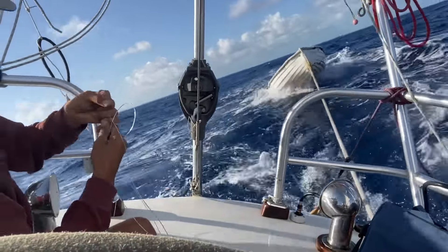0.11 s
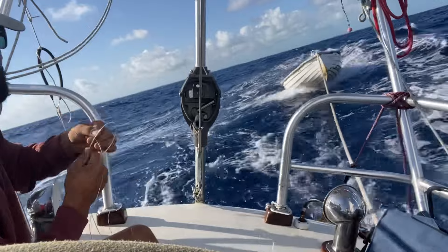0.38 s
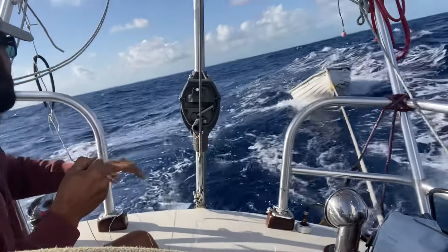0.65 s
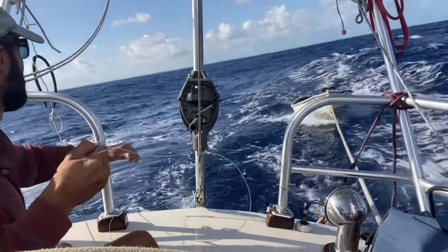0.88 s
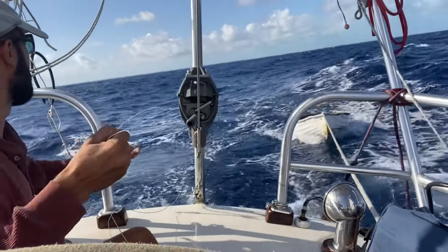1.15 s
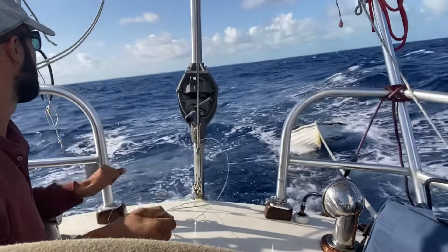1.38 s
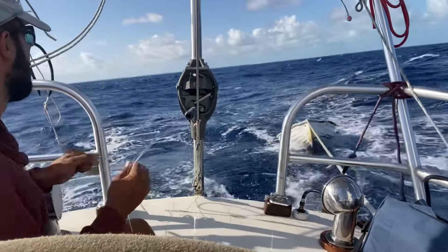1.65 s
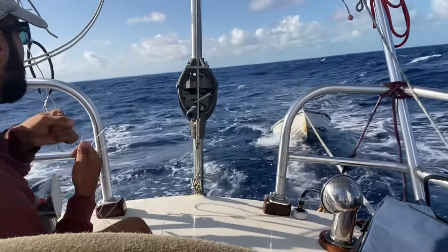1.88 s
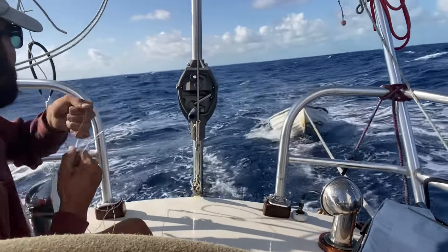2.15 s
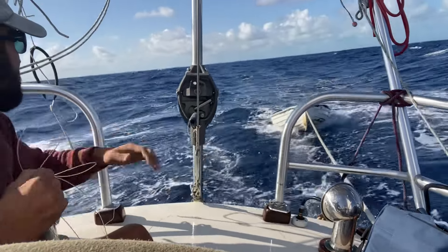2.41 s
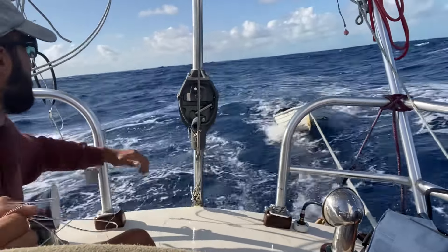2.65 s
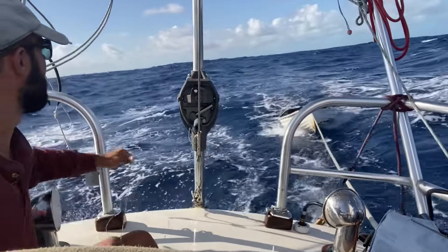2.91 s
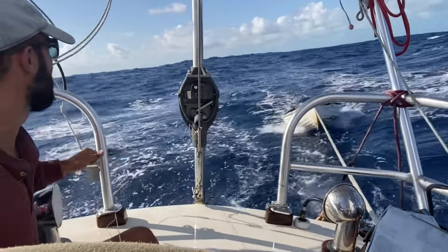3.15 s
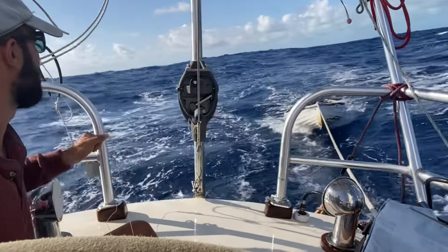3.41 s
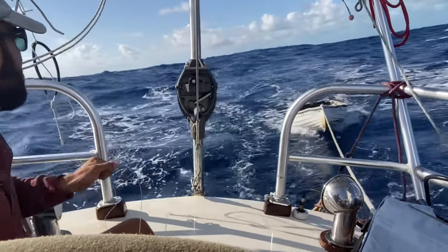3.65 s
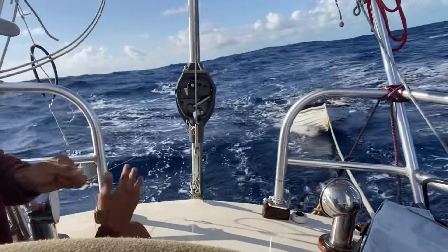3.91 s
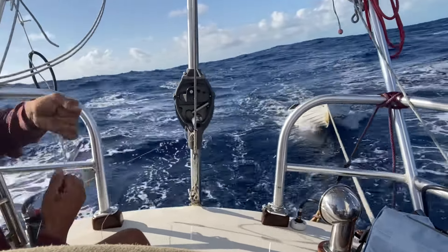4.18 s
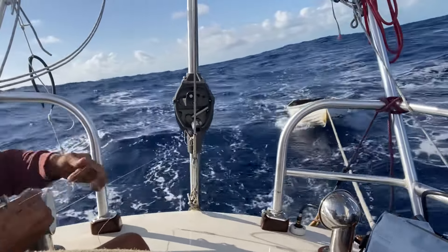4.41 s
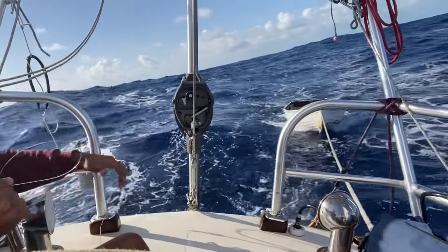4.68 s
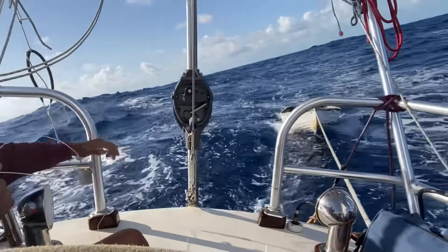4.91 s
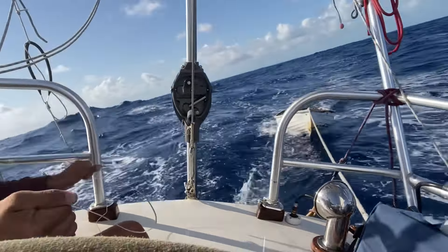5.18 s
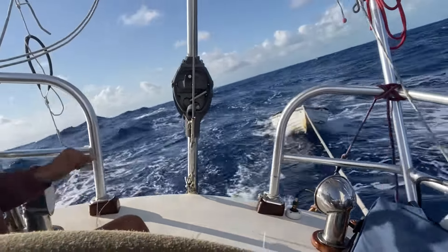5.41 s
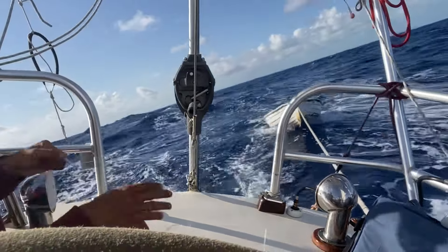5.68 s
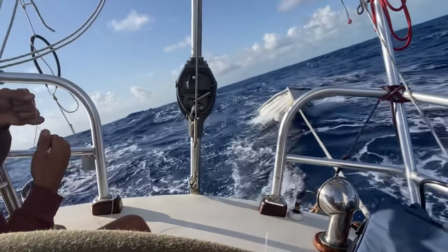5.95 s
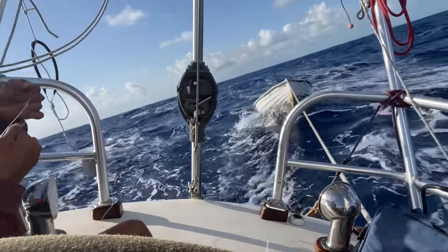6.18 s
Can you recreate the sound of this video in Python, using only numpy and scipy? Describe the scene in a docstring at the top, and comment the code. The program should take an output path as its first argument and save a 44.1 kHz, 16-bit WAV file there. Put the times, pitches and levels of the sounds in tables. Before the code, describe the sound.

Wind hits a small stereo microphone in the open cockpit of a sailboat, far louder than the sea. From 0 s a lumpy low rumble and flutter rise quickly, with dull air thuds around 0.3 to 0.7 s and again from 0.9 to 1.5 s, joined by short rough puffs on the right. From about 1.8 s the puffs thicken, crackling and tearing, with heavy blows near 2.3, 2.7, 3.05 and 3.2 s and the hardest puff at 3.54 s. A tiny metal rattle ticks at 2.55 s. Another tight group of deep thumps comes at 4.1 to 4.5 s; afterwards the wind eases, with small puffs at 5.15 and 5.5 s and a low thud at 6.1 s. Throughout, faint foam hiss and duller water wash waver behind, with small bright spray slaps near 1.25, 1.4, 3.5 and 3.9 s. It ends at 6.3 s mid-wind.

```python
"""Gusts buffet the two ports of a small stereo microphone in the cockpit of a sailboat in a rough sea.
Turbulence is shaped noise that swells in lumps: low rumble, flutter above it and crackle, more on the right.
Low tone bursts are thuds of air; bursts of noise and falling tone are puffs of large eddies on the right port.
Behind the wind, wandering hiss and wash are the foam of the wake, bright noise bursts are slaps of spray,
and a few decaying modes make a metal fitting rattle once."""
import sys
import numpy as np
from scipy import signal
from scipy.fft import rfft, irfft, next_fast_len
from scipy.io import wavfile
from scipy.ndimage import uniform_filter1d, map_coordinates

SR = 44100
rng = np.random.default_rng(int(sys.argv[2]) if len(sys.argv) > 2 else 0)


def master_out(mix):
    """Clip the mix to full scale and print it as 16-bit PCM to the path in sys.argv[1]."""
    frames = np.transpose(np.atleast_2d(mix))
    ceiling = np.clip(frames, -1, 1)
    pcm = np.round(ceiling * 32767).astype(np.int16)
    wavfile.write(sys.argv[1], SR, pcm)


def invert_db(level):
    """Linear amplitude ratio for a level in decibels (20 dB per decade), elementwise."""
    return 10 ** (np.asarray(level, dtype=float) / 20)


N = 278271  # samples

# wind on the ports, as rumble outside the lulls: (time [s], level [dB])
WIND_STRENGTH = [(0.0, -32.5), (0.2, -32), (0.3, -20.5), (0.4, -31.5), (0.55, -23.5), (0.7, -20.5),
                 (0.77, -31.5), (0.95, -21), (1.04, -28.5), (1.2, -21), (1.9, -21), (1.97, -25),
                 (2.15, -21.5), (3.76, -20), (3.83, -24.5), (4.12, -17), (4.33, -20.5), (4.39, -20.5),
                 (4.52, -20), (4.67, -26), (4.97, -21), (5.24, -22), (5.32, -31), (5.45, -22.5),
                 (5.55, -24.5), (5.72, -27.5), (5.85, -23.5), (6.1, -25.5), (6.31, -24.5)]
# flutter relative to the wind, away from thuds: (time [s], level [dB])
FLUTTER_RATIO = [(0.0, -3.5), (0.5, -2.5), (0.7, -5), (1.1, -7.5), (1.16, 5), (1.21, -1.5), (1.26, -7),
                 (1.9, -2), (2.4, -9.5), (3.6, -6), (4.07, -12), (4.11, -2), (4.19, -0.5), (4.24, -10),
                 (4.3, -3.5), (4.6, -11.5), (5.05, -5), (5.3, -8), (5.8, -4.5), (6.31, -3.5)]
# small eddies, mean of both ports: (time [s], level [dB])
CRACKLE_STRENGTH = [(0.0, -41), (0.68, -39), (1.1, -40.5), (1.3, -37), (1.93, -40), (2.3, -35), (3.9, -35),
                    (4.83, -42), (6.31, -42)]
# slugs of air: (time of the swell's peak on the right [s], envelope peak [dB], frequency [Hz])
AIR_SLUGS = [(0.308, -9.5, 130), (0.53, -12, 111), (0.618, -8, 89), (0.661, -10.5, 74.6), (0.921, -9, 119),
             (0.968, -14, 80), (1.076, -10, 88), (1.18, -15, 121), (1.2, -10, 130), (1.265, -7, 115),
             (1.372, -9.5, 121), (1.498, -10, 94.5), (1.793, -9, 133), (2.178, -8.5, 80),
             (2.317, -6.5, 133), (2.702, -6, 99), (2.866, -6, 91.5), (3.047, -10, 117), (3.215, -5, 125),
             (4.089, -10, 83), (4.215, -9.5, 99), (4.296, -4.5, 126), (4.338, -6, 121), (4.514, -9, 112),
             (5.446, -17, 91), (6.113, -10, 66)]
# largest eddies, before the gain of each port: (time [s], level [dB], nominal frequency [Hz])
LARGE_EDDIES = [(0.295, -11.5, 810), (0.316, -12, 824), (0.795, -10, 800), (1.195, -12.5, 950),
                (1.179, -11, 1100), (1.262, -10, 1050), (1.345, -14, 1090), (1.471, -15.5, 970),
                (1.516, -13.5, 1040), (1.85, -9.5, 1040), (2.012, -9, 1230), (2.067, -16, 780),
                (2.09, -9.5, 905), (2.166, -9.5, 846), (2.235, -10, 1190), (2.312, -9.5, 880),
                (2.476, -19, 930), (2.483, -10, 865), (2.515, -15, 1050), (2.591, -9, 977),
                (2.697, -6, 1350), (2.701, -10.5, 1920), (2.705, -6, 1150), (2.796, -11.5, 1110),
                (3.001, -12, 840), (3.041, -6, 1070), (3.075, -16, 950), (3.086, -12, 980),
                (3.101, -13, 1060), (3.159, -12, 1200), (3.181, -14.5, 1000), (3.209, -12.5, 1010),
                (3.472, -12, 1300), (3.54, -3.5, 1010), (3.627, -9.5, 1180), (3.653, -12, 1280),
                (3.6675, -8, 1150), (3.685, -8, 1030), (3.716, -15, 1090), (3.726, -15, 1040),
                (3.982, -14.5, 1090), (4.159, -15, 744), (4.305, -22, 653), (4.471, -14, 1140),
                (5.144, -10.5, 870), (5.49, -13, 860)]
# contacts of a small metal fitting in the rigging: (time [s], level [dB], pitch factor [1])
CONTACTS = [(2.5519, -26.5, 1.05), (2.557, -27, 1.0), (2.561, -30, 0.85), (2.568, -29, .93)]
# modes of the fitting, before random spread: (frequency [Hz], level [dB], decay by 60 dB [s])
FITTING_MODES = [(1420, 1, 0.032), (1790, 2, 0.031), (3330, 1, 0.02), (7080, -4, 0.016)]
# slaps of spray: (time [s], level [dB], centre frequency [Hz])
SPRAY_SLAPS = [(1.254, -27, 3250), (1.4063, -28, 4620), (3.534, -25, 4900), (3.883, -25, 8200)]
# foam in the wake: (time [s], hiss level [dB], wash level [dB])
FOAM = [(0.0, -44.5, -40.5), (0.28, -43, -41), (0.44, -45.5, -43), (0.52, -41.5, -40), (0.8, -45, -41.5),
        (1.15, -48, -47), (1.3, -45.5, -43), (1.54, -49, -47.5), (2.3, -46, -43), (2.48, -48.5, -46.5),
        (2.68, -44, -43), (3.13, -49, -48.5), (3.6, -45.5, -47), (4.27, -49, -50.5), (4.52, -46, -44.5),
        (4.95, -50, -48.5), (5.18, -49.5, -48), (5.48, -47, -45), (6.06, -45.5, -44.5), (6.18, -44, -44),
        (6.31, -47.5, -48.5)]
# bands in which rumble, flutter, crackle, hiss and wash have their levels: (low [Hz], high [Hz])
LEVEL_BANDS = [(40, 180), (200, 700), (800, 2000), (6000, 9500), (2200, 5000)]
# relative spectra of the five noises: (frequency [Hz], level [dB])
RUMBLE_SPECTRUM = [(15, -60), (25, -30), (40, -6.5), (62, -0.5), (100, -3), (170, -11), (300, -22),
                   (600, -30), (2000, -120)]
FLUTTER_SPECTRUM = [(40, -69), (120, -4.5), (250, -1.5), (450, -3.5), (800, -10.5), (1300, -27),
                    (2500, -37), (12000, -120)]
CRACKLE_SPECTRUM = [(100, -47), (400, -1), (800, 5), (1300, -3.5), (2000, -15), (3000, -61), (9000, -74)]
HISS_SPECTRUM = [(1000, -64), (3500, -9), (6000, -1.5), (8000, 1), (11000, -1), (14000, -4.5), (15700, -7)]
WASH_SPECTRUM = [(100, -48), (300, 5), (800, 2.5), (1500, 1.5), (2500, -1.5), (3700, -5), (5000, -8),
                 (7000, -13.5), (16000, -75)]
# likeness and phase of the two channels: (frequency [Hz], likeness [0-1], lead of the right [rad])
RUMBLE_HEARING = [(30, 0.53, -0.19), (130, 0.48, -1.15), (400, 0.34, -1.4)]
FLUTTER_HEARING = [(150, 0.94, 0), (345, 0.8, -1.5), (617, 0.058, -3), (1400, 0.3, -0.5)]
CRACKLE_HEARING = [(400, 0.48, -3.5), (595, 1, -3), (1370, 0.37, 0), (2130, 1, 2)]
HISS_HEARING = [(4930, 0.36, 4.5), (5720, 0.66, 0.5), (7950, .99, 0.5), (9630, 1, -2), (11510, 1, -4.5),
                (13650, 0.86, -7), (15300, 0.98, -9.5)]
WASH_HEARING = [(1440, 0.7, 1.21), (2810, 0.5, 3.06), (4160, 0.19, 4.22), (5400, 0.13, 3.6)]

RUMBLE_BAND, FLUTTER_BAND, CRACKLE_BAND, HISS_BAND, WASH_BAND = LEVEL_BANDS
STIR_DB, STIR_S = 3.5, 0.021  # flare of the flutter around each thud: height, half length
LULL_DB = 4  # the loose rumble yields while a thud passes
THUD_LAG_S, THUD_CYCLES = 0.0012, 0.68  # delay of the left, half length in cycles
PUFF_LAG_S = 0.00057  # delay of the left
PUFF_RIGHT_DB, PUFF_LEFT_DB = 2.5, -6.5  # gain on each port
PUFF_CYCLES, PUFF_GROWS = 3.75, 0.46  # swell time in cycles at 0 dB, its growth in dB per dB
PUFF_FALL = 0.44  # fall of the whirl in octaves per swell time
SLAP_S, SLAP_OCTAVES = 0.0036, 1  # swell time, width


def unit(x):
    """Normalisation: scales a signal to rms 1."""
    return x / np.sqrt(np.mean(x ** 2) + 1e-20)


def curves(rows):
    """Linear interpolation: one value per sample for each column after the time."""
    s, *cols = np.transpose(rows)
    return [np.interp(np.arange(N) / SR, s, c) for c in cols]


def wobble(rate):
    """Band-limited fluctuation: a smooth random curve with rate knots a second."""
    knots = rng.standard_normal(int(N * rate / SR) + 4)
    return map_coordinates(knots, [np.arange(N) * rate / SR])


def stereo(pair, spectrum, hearing, band):
    """Coherence: two coloured inputs mix to a given likeness and phase; their mean has rms 1 in the band."""
    size = next_fast_len(N + 8192)
    hz = np.fft.rfftfreq(size, 1 / SR)
    f, db = np.transpose(spectrum)
    a, b = rfft(pair, size) * invert_db(np.interp(np.log(hz + 1), np.log(f + 1), db))
    f, alike, lead = np.transpose(hearing)
    # the cosine of twice this angle is the likeness
    turn = np.arccos(np.clip(np.interp(hz, f, alike), 0, 1)) / 2
    half_lead = np.exp(.5j * np.interp(hz, f, lead))
    mid, side = a * np.cos(turn), b * np.sin(turn)
    both = np.array([(mid + side) / half_lead, (mid - side) * half_lead])
    inside = irfft(both.mean(axis=0) * (hz > band[0]) * (hz < band[1]), size)[:N]
    return irfft(both, size)[:, :N] / inside.std()


def patchy(depth_db):
    """Intermittency: the gain of two noises wanders in patches of time and frequency."""
    z = signal.stft(rng.standard_normal((2, N)), nperseg=512)[2]
    field = rng.standard_normal(z.shape[1:])
    field = uniform_filter1d(field, size=8, axis=0)
    field = uniform_filter1d(field, size=10, axis=1)
    return signal.istft(z * invert_db(depth_db * unit(field)), nperseg=512)[1][:, :N]


def burst(hz, width, life, whirl=0):
    """Transient excitation: noise around hz, with a share of falling tone, swells and fades to peak 1."""
    t = np.arange(SR // 10) / SR
    octaves = np.log2((np.fft.rfftfreq(len(t), 1 / SR) + 1) / hz)
    # steeper above hz than below
    colour = np.exp(-.5 * (octaves / np.where(octaves > 0, 0.32 * width, width)) ** 2)
    noise = unit(irfft(rfft(rng.standard_normal(len(t))) * colour, len(t)))
    pitch = hz * 2 ** (PUFF_FALL * (1 - t / life))
    turning = np.sin(2 * np.pi * (np.cumsum(pitch) / SR + rng.random()))
    swell = np.exp(-np.abs(t / life - 1) ** 1.9)
    onset = 1 - np.exp(-(2 * t / life) ** 2)
    x = ((1 - whirl) * noise + whirl * turning) * swell * onset
    return x / np.abs(x).max()


def buffeting():
    """Turbulence: eddies of every size swell rumble and flutter together; the smallest burst as crackle."""
    wind_db, = curves(WIND_STRENGTH)
    crackle_db, = curves(CRACKLE_STRENGTH)
    flutter_db = wind_db + curves(FLUTTER_RATIO)[0]
    t = np.arange(N) / SR
    passing = np.max([np.exp(-((t - s) / STIR_S) ** 2) for s, db, hz in AIR_SLUGS], axis=0)
    flutter_db += STIR_DB * passing
    lumps, eddies, small = wobble(9), wobble(22), wobble(70)

    rumble_gain = invert_db(0.65 * lumps + 0.59 * eddies + 0.7 * wobble(15))
    rumble_noise = rumble_gain * rng.standard_normal((2, N))
    rumble = stereo(rumble_noise, RUMBLE_SPECTRUM, RUMBLE_HEARING, RUMBLE_BAND)

    flutter_gain = invert_db(0.52 * lumps + 0.98 * eddies + 3.5 * small)
    flutter_noise = flutter_gain * patchy(depth_db=2.0)
    flutter = stereo(flutter_noise, FLUTTER_SPECTRUM, FLUTTER_HEARING, FLUTTER_BAND)

    # about 190 tiny puffs a second, each 4.1 ms long, over steady noise
    sizes = invert_db(np.minimum(3 * rng.standard_normal(N) + 3 * small, 7))
    sizes = (rng.random(N) < 190 / SR) * sizes
    ticks = 0.68 + np.convolve(sizes, np.hanning(round(0.0041 * SR)), "same")
    crackle_noise = ticks * rng.standard_normal((2, N))
    crackle = stereo(crackle_noise, CRACKLE_SPECTRUM, CRACKLE_HEARING, CRACKLE_BAND)

    out = invert_db(wind_db - LULL_DB * passing) * rumble
    out = out + invert_db(flutter_db) * flutter
    return out + invert_db(crackle_db + [[-2.2], [2.2]]) * crackle  # stronger on the right


def thuds():
    """Pressure pulses: each slug of air is a low tone in a Gaussian swell, a little late on the left."""
    t = np.arange(N) / SR - [[THUD_LAG_S], [0]]
    out = np.zeros((2, N))
    for s, db, hz in AIR_SLUGS:
        swell = np.exp(-((t - s) * hz / THUD_CYCLES) ** 2)
        out += invert_db(db) * swell * np.sin(2 * np.pi * (hz * (t - s) + rng.random()))
    return out


def puffs():
    """Vortex bursting: a whirl slows over a slower push; the left has a late, weak inverse and its own noise."""
    out = np.zeros((2, N + SR))
    for s, db, hz in LARGE_EDDIES:
        life = PUFF_CYCLES * invert_db(PUFF_GROWS * db) / hz  # weaker eddies are shorter
        near = burst(hz * 1.197, 1.15, life, whirl=0.47)
        own = burst(hz * 0.74, 0.8, life)
        push = 0.41 * burst(hz * 0.32, 0.99, 2.44 * life)
        right = invert_db(db + PUFF_RIGHT_DB) * (near + push)
        left = invert_db(db + PUFF_LEFT_DB) * (1.1 * own - 0.12 * near + push)
        out[1, round(s * SR):][:len(near)] += right
        out[0, round((s + PUFF_LAG_S) * SR):][:len(near)] += left
    return out[:, :N]


def fitting():
    """Modal vibration: every contact scrapes briefly and rings the same few modes at a shifted pitch."""
    out, t = np.zeros(N + SR), np.arange(SR // 10) / SR
    for s, db, pitch in CONTACTS:
        ring = np.zeros(len(t))
        for hz, level, t60 in FITTING_MODES:
            decay = invert_db(level + rng.normal(0, 1.2) - 60 * t / t60)
            ring += decay * np.sin(2 * np.pi * hz * pitch * rng.normal(1, 0.019) * t)
        scrape = 0.52 * burst(6500, 1.0, life=0.0023)
        out[round(s * SR):][:len(t)] += invert_db(db) * (ring + scrape)
    return out[:N]


def spray():
    """Impact noise: each slap of drops is a bright burst with the channel phases of the hiss."""
    out = np.zeros((2, N + SR))
    for s, db, hz in SPRAY_SLAPS:
        slap = np.array([burst(hz, SLAP_OCTAVES, SLAP_S), burst(hz, SLAP_OCTAVES, SLAP_S)])
        out[:, round(s * SR):][:, :slap.shape[1]] += invert_db(db) * slap
    drops = out[:, :N]
    flat = [(20, 0), (20000, 0)]
    return drops.std() * stereo(drops, flat, HISS_HEARING, (0, SR))


def sea():
    """Bubble noise: bursting foam is a fine hiss with sparse louder pops, over a duller, more diffuse wash."""
    hiss_db, wash_db = curves(FOAM)
    pops = 1 + (rng.random(N) < .004) * rng.exponential(size=N)
    fizz = invert_db(0.65 * wobble(9) + 0.91 * wobble(45))
    hiss_noise = fizz * pops * patchy(depth_db=1.2)
    hiss = stereo(hiss_noise, HISS_SPECTRUM, HISS_HEARING, HISS_BAND)
    wash_noise = fizz * patchy(depth_db=1.5)
    wash = stereo(wash_noise, WASH_SPECTRUM, WASH_HEARING, WASH_BAND)
    return invert_db(hiss_db) * hiss + invert_db(wash_db) * wash


def scene():
    """Superposition: wind on the ports, the rattle, and the sea behind."""
    return buffeting() + thuds() + puffs() + fitting() + spray() + sea()


def roll_off(x):
    """The treble ends steeply here."""
    return signal.sosfilt(signal.butter(12, 15720, fs=SR, output="sos"), x)


def record(dry):
    """Saturation: the input stage rounds off the highest peaks."""
    mix = dry / (1 + np.abs(dry / 0.83) ** 5) ** (1 / 5)
    return roll_off(mix)


dry = scene()
out = record(dry)
master_out(out)
```